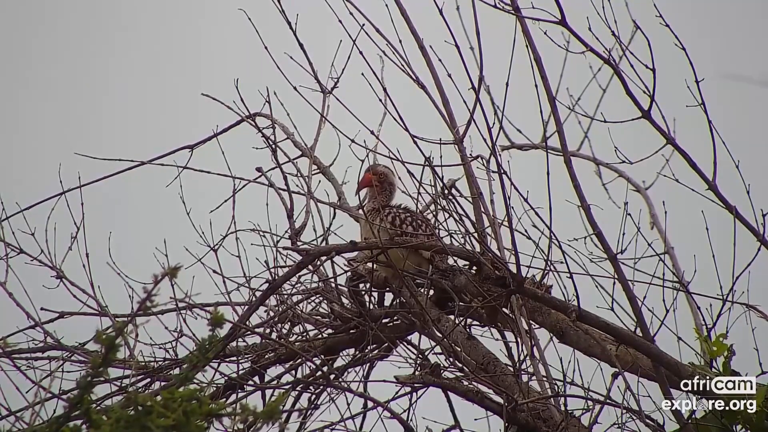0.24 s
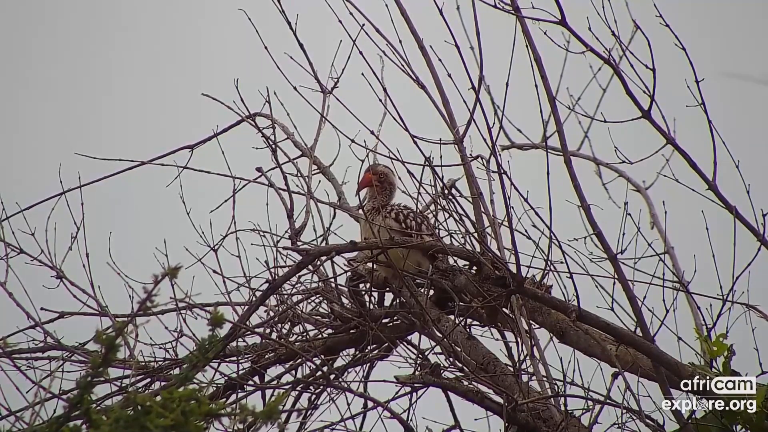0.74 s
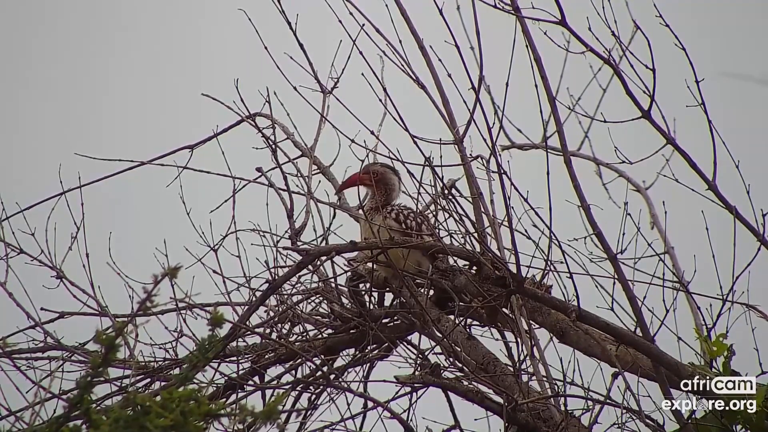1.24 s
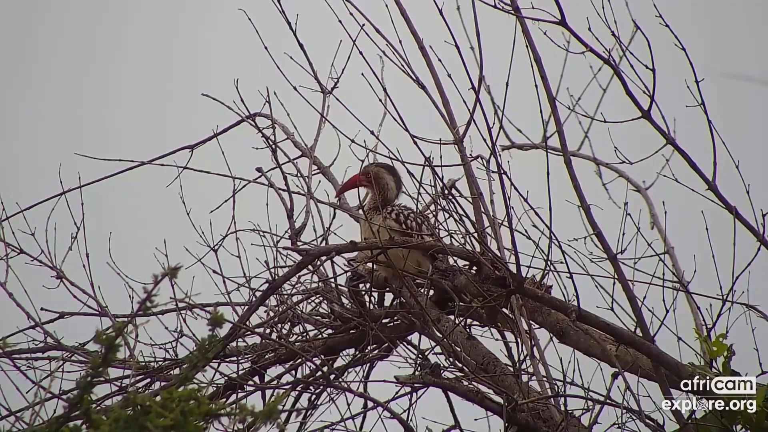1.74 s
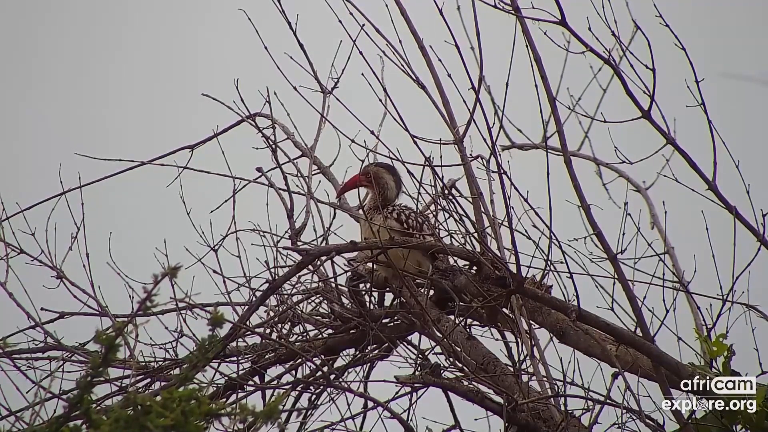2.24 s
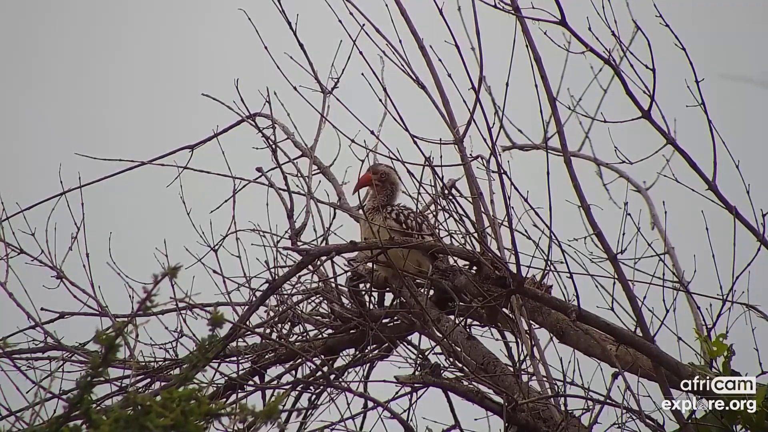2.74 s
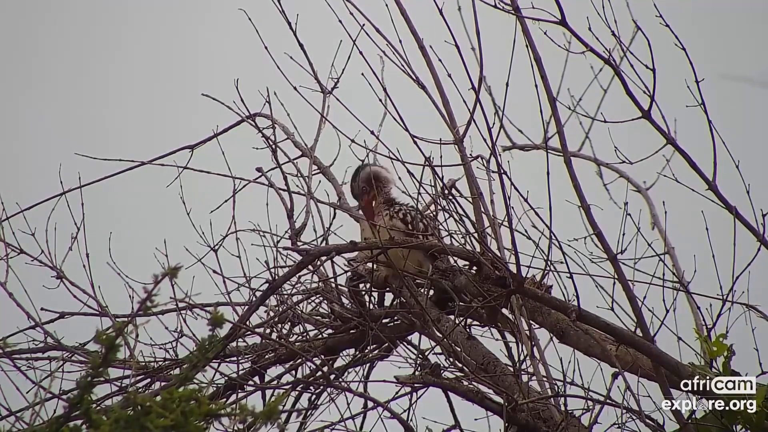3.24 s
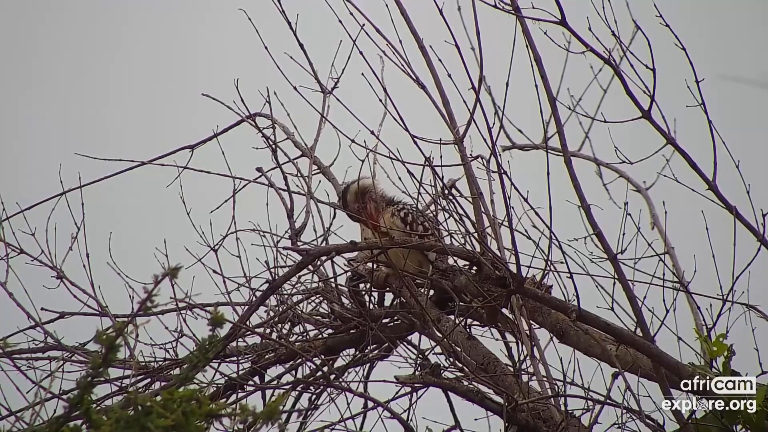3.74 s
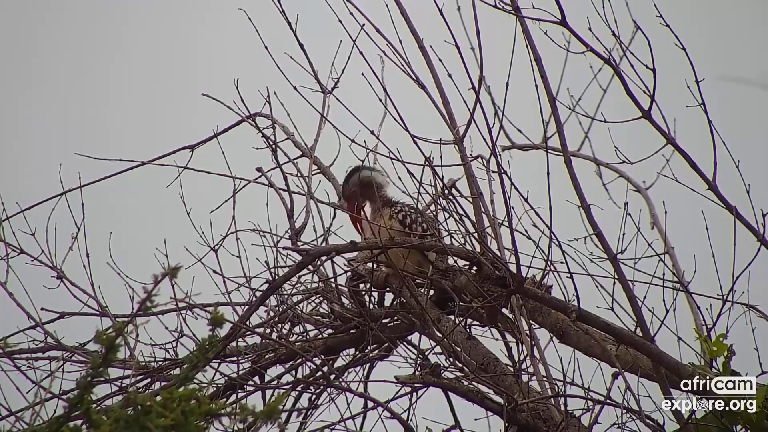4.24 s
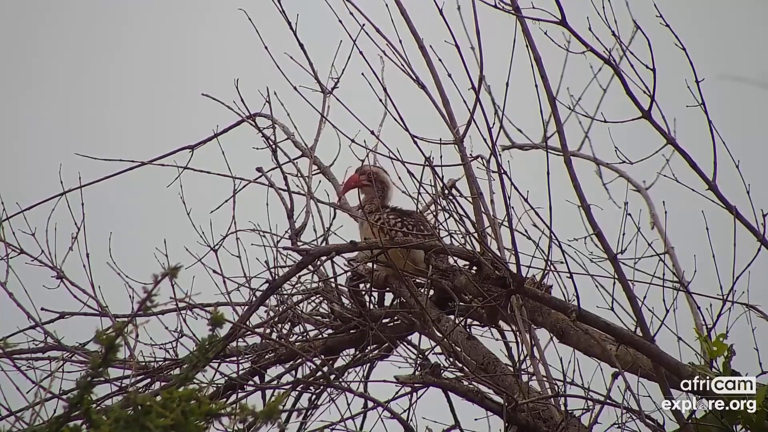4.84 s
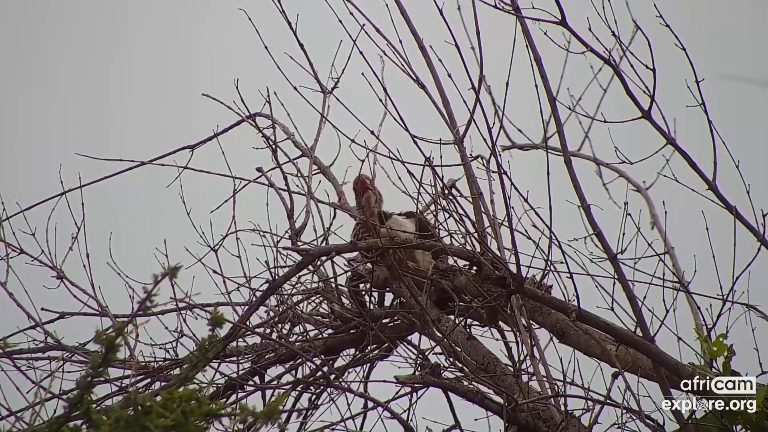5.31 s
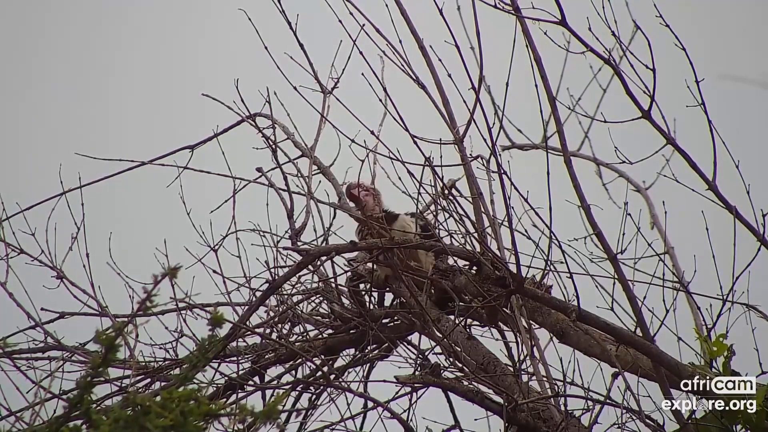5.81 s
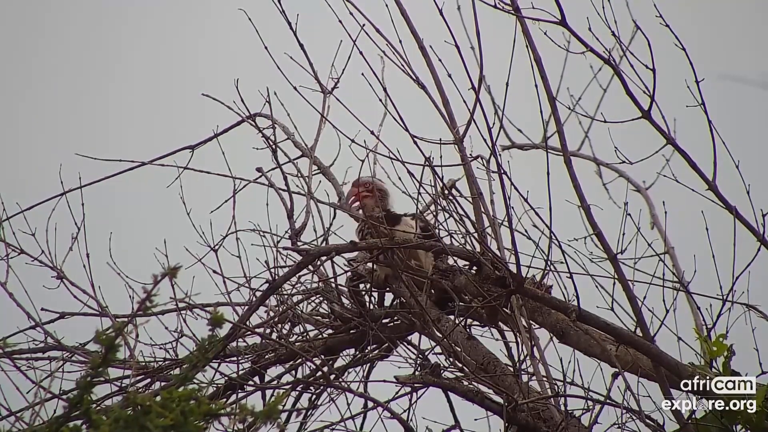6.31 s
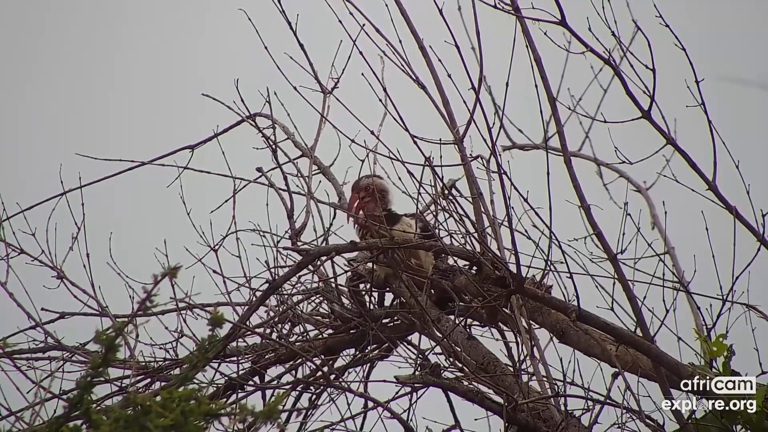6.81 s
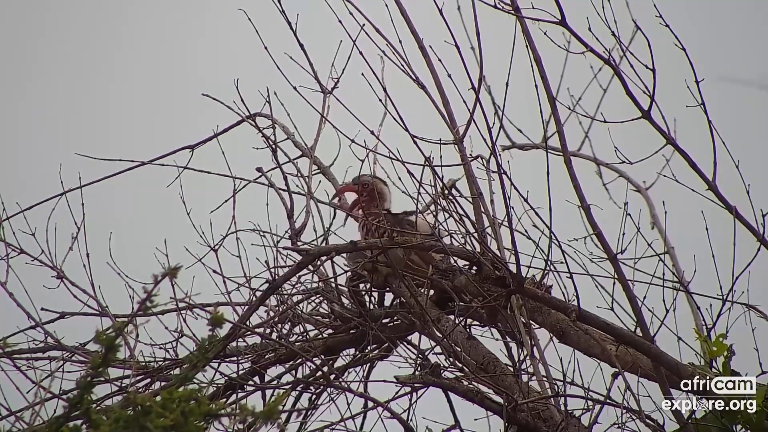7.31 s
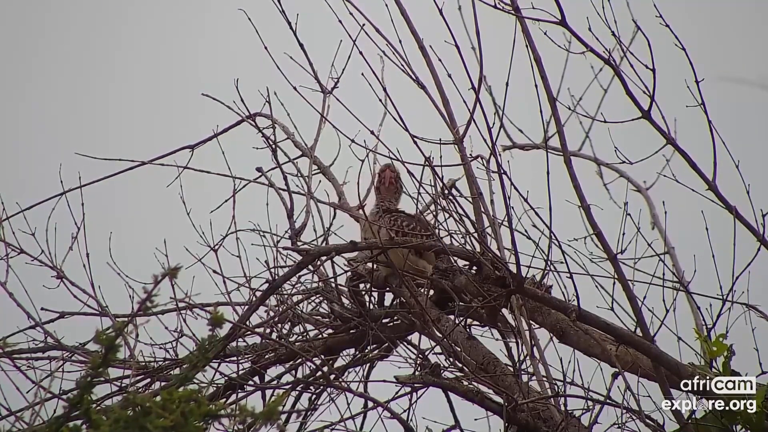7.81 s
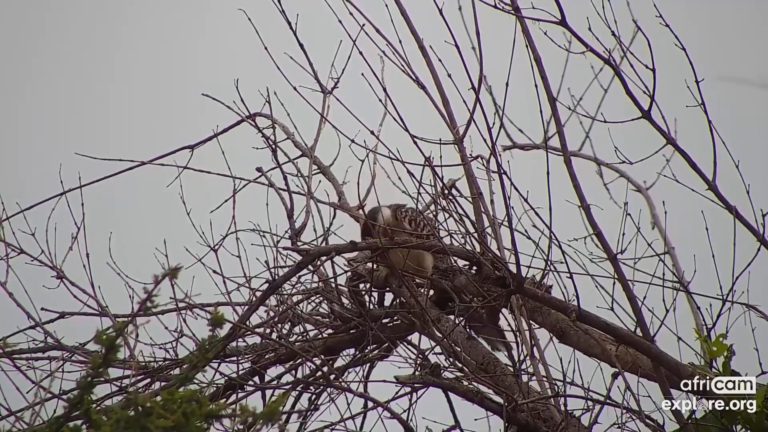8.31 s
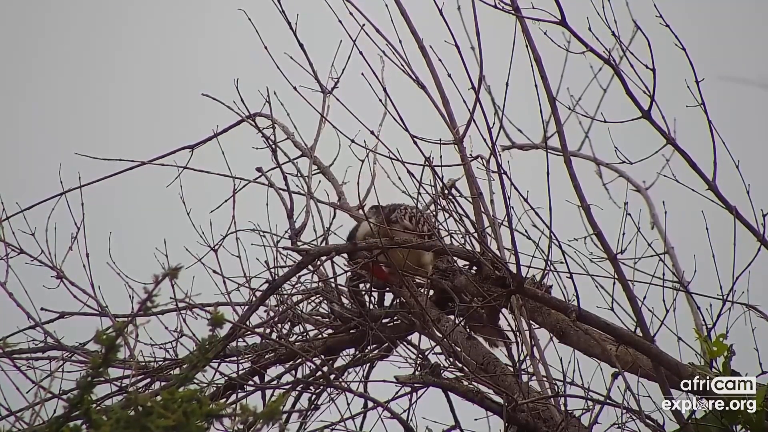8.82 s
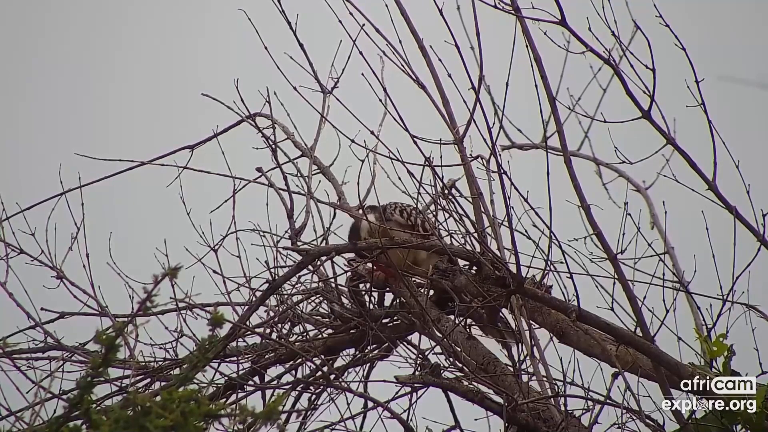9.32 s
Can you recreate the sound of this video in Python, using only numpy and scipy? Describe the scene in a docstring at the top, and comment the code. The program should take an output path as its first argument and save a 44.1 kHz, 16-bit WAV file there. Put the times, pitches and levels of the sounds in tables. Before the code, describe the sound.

Outdoors, a near hornbill calls four times within the first two seconds: a clear whistle sweeping upward, roughened by quick rasps that merge into a short screech. Afterwards it is silent, and farther small birds carry on with falling piped phrases, chirps, hoarse churrs and high twittering, softly echoing through the bush. A low machine hum throbs steadily beneath, with open-air wash and light microphone hiss.

```python
"""Hornbill calling from its nest

A near hornbill on a nest of sticks in a bare tree gives four rising calls: a gliding sine whistle, broken by
quick rasps of irregular pulses ringing the throat, that run together at the end.
Farther off in the bush small birds pipe, chirp, churr and twitter, in gliding sines and narrow noise with echoes.
Under it all a machine hums with a throb in low tones, over noise for open country and microphone hiss."""
import sys
import numpy as np
from scipy import signal
from scipy.fft import rfft, irfft, next_fast_len
from scipy.io import wavfile
from scipy.ndimage import uniform_filter1d

SR = 44100
rng = np.random.default_rng(int(sys.argv[2]) if len(sys.argv) > 2 else 0)


def master_out(mix):
    """Clip the mix to full scale and print it as 16-bit PCM to the path in sys.argv[1]."""
    frames = np.transpose(np.atleast_2d(mix))
    ceiling = np.clip(frames, -1, 1)
    pcm = np.round(ceiling * 32767).astype(np.int16)
    wavfile.write(sys.argv[1], SR, pcm)


N = 421596
TIME = np.arange(N) / SR


def gain_of(db):
    """Decibels to amplitude."""
    return 10 ** (np.asarray(db) / 20)


def evened(x):
    """Scales to rms 1."""
    return x / np.sqrt(np.mean(x ** 2) + 1e-20)


def read(points, hz):
    """Reads a spectrum on a log-frequency axis."""
    f, value = np.transpose(points)
    return np.interp(np.log(hz + 1), np.log(f + 1), value)


def follow(rows, t):
    """Reads every column of a curve table at the times t."""
    s, *columns = np.transpose(rows)
    return [np.interp(t, s, c) for c in columns]


def add(mix, s, sound):
    """Mixes a sound in at s seconds."""
    part = mix[max(round(s * SR), 0):][:len(sound)]
    part += sound[:len(part)]


def wander(size, hz):
    """Slow random movement of about rms 1, fading out above roughly hz."""
    f = np.fft.rfftfreq(size + SR, 1 / SR)
    spectrum = rfft(rng.standard_normal(size + SR))
    return evened(irfft(spectrum * np.exp(-(f / hz) ** 2)))[:size]


def coloured(spectrum):
    """Noise with the given spectrum, scaled to rms 1."""
    size = next_fast_len(N)
    gains = gain_of(read(spectrum, np.fft.rfftfreq(size, 1 / SR)))
    return evened(irfft(rfft(rng.standard_normal(size)) * gains, size)[:N])


def resonate(x, hz, width):
    """A two-pole resonance of gain 1 whose centre can follow a curve: shift down, low-pass, shift back."""
    turn = np.exp(2j * np.pi * np.cumsum(hz * np.ones(len(x))) / SR)
    r = np.exp(-np.pi * width / SR)
    smoothed = signal.lfilter([(1 - r) ** 2], [1, -2 * r, r * r], x / turn)
    return 2 * (turn * smoothed).real


def slur(length, start_hz, middle_hz, end_hz, db, waver=0.004, flutter=0.36):
    """One whistled note of a small bird: a sine gliding along an arch, unsteady in pitch and strength."""
    u = np.linspace(0, 1, int(length * SR))
    arch = np.polyfit([0, .5, 1], [start_hz, middle_hz, end_hz], 2)
    hz = np.polyval(arch, u)
    shake, swell = signal.resample(rng.standard_normal((int(length * 200) + 2, 2)), len(u)).T
    tone = np.sin(2 * np.pi * np.cumsum(hz * (1 + waver * shake)) / SR)
    return gain_of(db) * np.sqrt(2) * tone * np.exp(flutter * swell) * signal.windows.tukey(len(u), .35)


def puff(length, hz, width, db):
    """A short hoarse note: noise in one resonance."""
    noise = resonate(rng.standard_normal(int(length * SR)), hz, width)
    return gain_of(db) * evened(noise) * signal.windows.tukey(len(noise), .5)


# Wash of the open air and microphone hiss. Each row: frequency in Hz, relative density in dB per Hz.
AIR_SPECTRUM = [(320, -35), (550, -14), (725, -13), (1200, -2), (1390, -3.5), (1620, -3), (2100, -8.5),
                (2380, -8.5), (2810, -13.5), (3220, -14.5), (4190, -20.5), (4870, -17), (5730, -22),
                (9000, -21), (11000, -23.5), (14300, -114), (22000, -120)]
# Slow growth of the wash; only its departure from the mean counts. Each row: time in seconds, level in dB.
AIR_SWELL = [(0.3, -52.5), (2.2, -52.0), (3.0, -52), (3.9, -53), (4.8, -51.6), (5.6, -50.5), (6.5, -51.5),
             (7.6, -52.5), (8.5, -51), (9.3, -50.5)]
# Narrow bands that sing faintly in the wash. Each row: centre in Hz, width setting in Hz, rms level in dB.
AIR_DRONES = [(1569, 64, -64.5), (1213, 400, -71)]


def air(level_db=-53.0, patchy_db=2.0, hiss_above_hz=4500):
    """Noise for the far bush shimmers in patches and swells slowly; the hiss above it stays more even."""
    hz, t, z = signal.stft(coloured(AIR_SPECTRUM), SR, nperseg=1024, noverlap=768)
    patches = uniform_filter1d(rng.standard_normal(z.shape), size=12, axis=1)
    patches = evened(uniform_filter1d(patches, size=4, axis=0))
    db, = follow(AIR_SWELL, t)
    outdoors = 1 / (1 + (hz[:, None] / hiss_above_hz) ** 4)  # 1 in the wash, towards 0 in the hiss
    z = z * gain_of(level_db + outdoors * (db - db.mean() + patchy_db * patches))
    wash = signal.istft(z, SR, nperseg=1024, noverlap=768)[1][:N]
    drones = np.zeros(N)
    for f, width, drone_db in AIR_DRONES:
        drones += gain_of(drone_db) * evened(resonate(rng.standard_normal(N), f, width))
    return wash + drones


# Tones of the machine. Each row: frequency in Hz, rms level in dB before the throb, swell with each throb
# as a share, sway in phase with each throb in radians.
MACHINE_TONES = [(75.1, -39.3, .58, .52), (87.62, -42.2, -.32, -.13), (112.64, -61, 0, 0),
                 (150.19, -51, .9, -.6), (193.21, -64, .7, 0), (300.4, -69, -.3, 1.1)]
# Low rumble around the hum. Each row: frequency in Hz, relative density in dB per Hz.
RUMBLE_SPECTRUM = [(20, -28), (32, -28), (45, -8.5), (56, 0.5), (70, -3), (90, -4), (108, -7.5),
                   (130, -8.5), (150, -5), (180, -6.5), (200, -13.5), (230, -21.5), (330, -24), (480, -32),
                   (700, -49.5)]
RUMBLE_DB, THROB_HZ = -42.5, 7.04


def machine(drift=0.01):
    """Low tones swell and sway with the machine's throb and beat against each other over a rumble."""
    throb = 2 * np.pi * (THROB_HZ * TIME + rng.random())
    tones = np.zeros(N)
    for hz, db, swell, sway in MACHINE_TONES:
        turn = 2 * np.pi * (hz * TIME + rng.random()) + sway * np.sin(throb)
        tones += gain_of(db) * np.sqrt(2) * (1 + swell * np.cos(throb)) * np.cos(turn)
    rumble = gain_of(RUMBLE_DB) * coloured(RUMBLE_SPECTRUM)
    return tones * (1 + drift * wander(N, 3)) + rumble


# The bush's reverberation. Each row: frequency in Hz, time to die away by 60 dB in seconds.
BUSH_DECAY = [(500, 0.45), (1500, 0.62), (3000, 1), (6000, 0.2)]


def bush(x):
    """Scattered echoes from trees and ground, each band dying at its own speed."""
    # about 2000 echoes a second, none within the first 8 ms
    taps = rng.standard_normal(SR) * (rng.random(SR) < 2000 / SR) * (np.arange(SR) > .008 * SR)
    hz, t, z = signal.stft(taps, SR, nperseg=256)
    fading = gain_of(-60 * t / read(BUSH_DECAY, hz)[:, None])
    tail = signal.istft(z * fading, SR, nperseg=256)[1]
    return signal.fftconvolve(x, tail / np.linalg.norm(tail))[:N]


# The clearest runs of a far, high twitter. Each row: first note in seconds, last note in seconds,
# level in dB about which the notes vary.
TWITTER_RUNS = [(0.045, 0.174, -66), (0.904, 1.176, -64.5), (2.049, 2.4, -68), (2.767, 3.034, -64.5),
                (3.5, 3.78, -67.5), (3.816, 4.003, -64), (4.559, 4.88, -67.5), (5.166, 5.383, -65),
                (5.55, 5.998, -66.5), (6.49, 6.712, -66), (7.31, 7.67, -64), (7.877, 8.2, -67.5),
                (8.473, 8.875, -67)]
FAINT_TWITTER_DB, FAINT_TWITTER_SHARE = -72, 0.55  # fainter notes may sound for this share of the time


def twitter(step_s=.046, length=0.0239, top_hz=5280, bottom_hz=4560, bout_hz=2.7):
    """Runs of tiny falling notes, each a little different; fainter runs come and go between the clear ones."""
    notes = []
    for first, last, db in TWITTER_RUNS:
        count = round((last - first) / step_s) + 1
        notes += [(s, db) for s in np.linspace(first, last, count)]
    mood = wander(N, bout_hz)
    singing = mood < np.quantile(mood, np.clip(FAINT_TWITTER_SHARE, 0, 1))
    for s in np.arange(0, TIME[-1], step_s):
        in_clear_run = any(first - step_s < s < last + step_s for first, last, _ in TWITTER_RUNS)
        if singing[int(s * SR)] and not in_clear_run:
            notes.append((s, FAINT_TWITTER_DB))
    out = np.zeros(N)
    for s, db in notes:
        shift, size_db = rng.standard_normal(2)
        glide = np.linspace(top_hz, bottom_hz, 3) * (1 + .015 * shift)
        add(out, s, slur(length, *glide, db + size_db))
    return out


# Hoarse churrs of far birds. Each row: start in seconds, length in seconds, centre in Hz, level in dB.
FAR_CHURRS = [(2.17, 0.037, 4100, -62), (2.354, .05, 4000, -63), (6.11, 0.084, 4400, -62),
              (6.32, .08, 4070, -63), (6.923, .091, 3100, -56.5), (7.165, 0.065, 3900, -59.5),
              (8.05, 0.075, 3700, -61), (8.758, .09, 3720, -61), (8.967, 0.072, 3300, -59)]
# width of a churr at the piping pitch; it grows with this power of the centre
CHURR_WIDTH_HZ, CHURR_WIDENING = 1200, 2.5


def churrs():
    """Hoarse notes of resonant noise, the higher the broader."""
    out = np.zeros(N)
    for s, length, hz, db in FAR_CHURRS:
        width = CHURR_WIDTH_HZ * (hz / PIPE_HZ) ** CHURR_WIDENING
        add(out, s, puff(length, hz, width, db))
    return out


# A buzzy upward slur. Each row: time in seconds, middle pitch in Hz, level in dB.
BUZZ_CURVE = [(3.02, 3180, -66), (3.13, 3350, -57), (3.181, 3650, -61), (3.23, 4310, -58),
              (3.26, 5070, -57.5), (3.311, 5500, -68)]


def buzz(trill_hz=125, swing_hz=680):
    """A rising note chopped into very quick downward flicks."""
    t = np.arange(BUZZ_CURVE[0][0], BUZZ_CURVE[-1][0], 1 / SR)
    hz, db = follow(BUZZ_CURVE, t)
    cycle = (t * trill_hz) % 1
    flick_hz = hz + 2 * swing_hz * (1 - 2 * cycle)
    tone = np.sin(2 * np.pi * np.cumsum(flick_hz) / SR) * np.sin(np.pi * cycle) ** 2
    out = np.zeros(N)
    add(out, t[0], gain_of(db) * evened(tone))
    return out


# Arched whistles of a second bird. Each row: start in seconds, length in seconds, top pitch in Hz, level in dB.
ARCHED_WHISTLES = [(0.749, 0.15, 3270, -67), (1.22, .087, 3285, -54), (1.652, 0.14, 3240, -65),
                   (2.423, 0.1, 3070, -66), (3.843, 0.11, 3300, -63), (4.25, 0.12, 3340, -67),
                   (4.665, .026, 5450, -65), (4.694, 0.046, 4220, -55.5), (6.987, .095, 3260, -58),
                   (7.397, .125, 3310, -61), (8.6, .12, 3170, -62.5), (9.017, .1, 3290, -54)]
ARCH_RISE, ARCH_FALL = 0.0436, .05  # how far below the top they start and end, as shares of the pitch
# Downward slurs. Each row: start in seconds, length in seconds, starting pitch in Hz, fall in Hz, level in dB.
DOWN_SLURS = [(0.073, .073, 3120, 446, -61), (.888, .09, 3740, 400, -69), (2.65, 0.16, 4330, 890, -66.5),
              (4.779, .045, 4660, 290, -58), (5.305, 0.042, 4020, 540, -65), (6.018, 0.039, 3660, 300, -59),
              (6.056, 0.051, 3130, 110, -60), (7.148, 0.027, 3540, 400, -57.5),
              (7.378, .026, 3100, 450, -59), (8.032, .04, 3450, 350, -60), (9.433, 0.096, 3940, 430, -60.5)]
SLUR_EARLY = .36  # share of the fall that is done halfway through: a slur steepens
# Low, nearly level pips. Each row: start in seconds, length in seconds, middle pitch in Hz, level in dB.
LOW_PIPS = [(0.13, 0.091, 2630, -57), (3.47, 0.057, 1810, -59), (7.588, 0.074, 1700, -56),
            (7.658, 0.083, 2010, -57.5), (8.092, .065, 1790, -58), (9.245, 0.049, 1913, -53),
            (9.31, 0.049, 1795, -55)]
PIP_DROOP = 0.013  # share of the pitch, each side of the middle
FAINT_PIPS_PER_S, FAINT_PIP_HZ, FAINT_PIP_SPREAD_HZ, FAINT_PIP_S, FAINT_PIP_DB = 2.0, 1900, 82, .075, -63.5


def small_birds():
    """Single whistled notes of three kinds: arches, downward slurs and level pips, with fainter pips at random."""
    out = np.zeros(N)
    for s, length, hz, db in ARCHED_WHISTLES:
        add(out, s, slur(length, hz * (1 - ARCH_RISE), hz, hz * (1 - ARCH_FALL), db))
    for s, length, hz, fall, db in DOWN_SLURS:
        add(out, s, slur(length, hz, hz - SLUR_EARLY * fall, hz - fall, db))
    faint = []
    for when, high in rng.random((round(FAINT_PIPS_PER_S * TIME[-1]), 2)):
        hz = FAINT_PIP_HZ + FAINT_PIP_SPREAD_HZ * (2 * high - 1)
        faint.append((when * TIME[-1], FAINT_PIP_S, hz, FAINT_PIP_DB))
    for s, length, hz, db in list(LOW_PIPS) + faint:
        add(out, s, slur(length, hz * (1 + PIP_DROOP), hz, hz * (1 - PIP_DROOP), db))
    return out


# Phrases of a piping bird. Each row: start in seconds, level of the notes in dB,
# hoarse breath of the first note in dB.
PIPING_PHRASES = [(1.203, -55, -63), (2.965, -51.5, -64), (4.575, -52, -59.5), (6.114, -55, -56.5),
                  (7.628, -55.5, -56), (9.035, -54, -59)]
# a phrase is three falling notes, each lower than the one before and trailed by a faint repeat; the last is softer
PIPE_HZ, PIPE_FALL_HZ, PIPE_S = 3170, 252.5, .054
PIPE_STEP_S, PIPE_STEP_HZ, LAST_NOTE_DB = .143, 99.2, -6
TRAIL_S, TRAIL_DB, TRAIL_FALL_HZ = .072, -12.5, 60


def piping(count=3, waver=.007, flutter=0.39, hoarse_s=.15, hoarse_width_hz=560, hoarse_above_hz=70,
           hoarse_step_db=3.5):
    """Phrases of falling sine notes that step downwards, each in a hoarse haze of resonant noise."""
    out = np.zeros(N)
    for start, db, hoarse_db in PIPING_PHRASES:
        for k in range(count):
            s = start + k * PIPE_STEP_S
            hz = PIPE_HZ - k * PIPE_STEP_HZ
            note_db = db + LAST_NOTE_DB * (k == count - 1)
            middle = hz - PIPE_FALL_HZ / 2
            note = slur(PIPE_S, hz, middle, hz - PIPE_FALL_HZ, note_db, waver, flutter)
            trail = slur(PIPE_S, middle + TRAIL_FALL_HZ / 2, middle, middle - TRAIL_FALL_HZ / 2,
                         note_db + TRAIL_DB, waver, flutter)
            haze_db = hoarse_db - k * hoarse_step_db
            add(out, s, note)
            add(out, s + TRAIL_S, trail)
            add(out, s, puff(hoarse_s, middle + hoarse_above_hz, hoarse_width_hz, haze_db))
    return out


# the pitch climbs along an S towards the same top in every call, steepest just before the break
TOP_HZ, CLIMB_LEAD_S, CLIMB_S = 1598, .052, 0.0288
# a call begins with a brief push on the whistle
PUSH_DB, PUSH_S = 2.5, .02
# the whistle stops swelling a little before the break; the rasp keeps swelling
FULL_LEAD_S, RASP_SWELL_DB_PER_S, SHRILL_SWELL_DB_PER_S = 0.031, 57, 55
# towards the end the whistle sags and fades, the shrill top with it; the rasp stops last
RELEASE_S, SAG_HZ_PER_S, WHISTLE_FADE_DB_PER_S, SHRILL_FADE_DB_PER_S = 0.046, 1870, 290, 141
RASP_STOP_S, RASP_STOP_DB, SHRILL_STOP_DB = 0.022, 17, 5


def call_shape(t, break_s, end_s, low_hz, swell, tone_db, harsh_db, top_db):
    """Pitch and the levels of whistle, rasp and shrill top: they climb towards the break and let go at the end."""
    u = t - break_s
    released = np.maximum(t - end_s + RELEASE_S, 0)
    hz = low_hz + (TOP_HZ - low_hz) / (1 + np.exp(-(u + CLIMB_LEAD_S) / CLIMB_S)) - SAG_HZ_PER_S * released
    push = PUSH_DB * np.exp(-(t - t[0]) / PUSH_S)
    stopping = np.maximum(1 - (end_s - t) / RASP_STOP_S, 0)
    tone_db = tone_db + push + swell * np.minimum(u + FULL_LEAD_S, 0) - WHISTLE_FADE_DB_PER_S * released
    harsh_db = harsh_db + RASP_SWELL_DB_PER_S * u - RASP_STOP_DB * stopping
    top_db = top_db + SHRILL_SWELL_DB_PER_S * np.minimum(u, 0)
    top_db = top_db - SHRILL_FADE_DB_PER_S * released - SHRILL_STOP_DB * stopping
    return hz, tone_db, harsh_db, top_db


# Resonances of the hornbill's throat. Each row: centre in Hz, width setting in Hz, relative level in dB.
THROAT_RESONANCES = [(1640, 520, 0), (2107, 290, 1.5), (2460, 350, -2.5), (3060, 520, -11)]
RASP_FLOOR = .32  # strength of the rasp between its bursts, against 1 once merged


def hornbill(start_s, break_s, end_s, low_hz, swell, whistle_db, rasp_db, shrill_db, catch,
             rasp_hz=49.4, merge_s=0.021, rattle_hz=450, jitter=0.3, catch_lead_s=0.027, catch_s=0.0034,
             shrill_hz=4280, shrill_width=620, shrill_fall=2000, uneven_db=0.7):
    """A clear rising whistle; bursts of irregular pulses break in, ring the throat and finally take over."""
    t = np.arange(start_s, end_s, 1 / SR)
    size = len(t)
    hz, tone_db, harsh_db, top_db = call_shape(t, break_s, end_s, low_hz, swell, whistle_db, rasp_db, shrill_db)
    merged = np.clip((t - break_s) / merge_s, 0, 1)
    bursts = (.5 + .5 * np.cos(2 * np.pi * rasp_hz * (t - break_s))) ** 2
    bursts *= gain_of(uneven_db * wander(size, 40))
    rasping = (1 - merged) * (RASP_FLOOR + bursts) + merged
    # the whistle is steady while it is much louder than the rasp, and is shaken as the rasp catches up
    shaken = rasping * np.minimum(gain_of(harsh_db - tone_db), 1)
    turns = np.cumsum(hz * (1 + (.003 + .06 * shaken) * wander(size, 450))) / SR
    whistle = np.sin(2 * np.pi * turns) * (1 + (.1 + .4 * shaken) * wander(size, 160))
    # the voice catches for a moment just before the break
    whistle *= 1 - catch * np.exp(-((t - break_s + catch_lead_s) / catch_s) ** 2)
    # uneven slaps of the membranes, with a little rushing air
    slaps = np.floor(np.cumsum(rattle_hz * np.exp(jitter * wander(size, 500))) / SR)
    drive = rasping * (evened(np.diff(slaps, prepend=0)) + .2 * rng.standard_normal(size))
    rasp = np.zeros(size)
    for k, (f, width, db) in enumerate(THROAT_RESONANCES):
        rasp += (-1) ** k * gain_of(db) * resonate(drive, f, width)  # neighbours in opposite polarity
    # the top resonance sinks through the call, by shrill_fall Hz a second
    shrill = resonate(drive, shrill_hz - shrill_fall * (t - break_s), shrill_width)
    call = gain_of(tone_db) * evened(whistle)
    call += gain_of(harsh_db) * evened(rasp)
    call += gain_of(top_db) * evened(shrill)
    return t[0], call * signal.windows.tukey(size, .02)


# Hornbill calls; at the break the separate rasps merge into one screech. Each row: start in seconds,
# break in seconds, end in seconds, pitch in Hz from which it climbs, swell of the whistle in dB per second,
# base levels of whistle, rasp and shrill top in dB, depth of the catch before the break from 0 to 1.
CALLS = [(0, 0.037, .086, 1450, 60, -35.5, -46, -50, 0),
         (0.448, .640, .719, 1370, 91, -38.5, -48.5, -52.5, .85),
         (1.082, 1.287, 1.364, 1350, 74, -35.5, -45.5, -51.5, 0.97),
         (1.789, 1.972, 2.055, 1320, 71, -37, -45, -48, 0.2)]
# Soft falling notes with which the hornbill leads into a call. Each row: start in seconds,
# length in seconds, starting pitch in Hz, fall in Hz, level in dB.
LEAD_IN_NOTES = [(0.407, 0.036, 1453, 110, -52.5), (1.036, 0.055, 1427, 310, -48),
                 (1.709, 0.049, 1434, 200, -50), (1.756, 0.029, 1450, 20, -53)]


def hornbill_calls(lead_rasp_db=-12, lead_rasp_hz=1800, lead_width_hz=1500, lead_shrill_db=-65,
                   lead_shrill_hz=4600, lead_shrill_width_hz=800):
    """The calls and their soft lead-in notes, falling sines made slightly hoarse by resonant noise."""
    out = np.zeros(N)
    for row in CALLS:
        add(out, *hornbill(*row))
    for s, length, hz, fall, db in LEAD_IN_NOTES:
        add(out, s, slur(length, hz, hz - fall / 2, hz - fall, db, waver=0.015))
        add(out, s, puff(length, lead_rasp_hz, lead_width_hz, db + lead_rasp_db))
        add(out, s, puff(length, lead_shrill_hz, lead_shrill_width_hz, lead_shrill_db))
    return out


def scene(near_echo_db=-23, far_echo_db=-12):
    """The near hornbill is almost dry; the far birds are wetter."""
    background = machine() + air()
    far = piping() + small_birds() + churrs() + buzz() + twitter()
    near = hornbill_calls()
    echoes = bush(gain_of(near_echo_db) * near + gain_of(far_echo_db) * far)
    return (near + far + echoes + background)[None]


EDGE_HZ = 11200


def record(dry):
    """The upper band limit of the pickup: a steep low-pass at EDGE_HZ."""
    low_pass = signal.firwin(511, EDGE_HZ, window=("kaiser", 9), fs=SR)
    return signal.oaconvolve(dry, low_pass[None], "same")


dry = scene()
out = record(dry)
master_out(out)
```